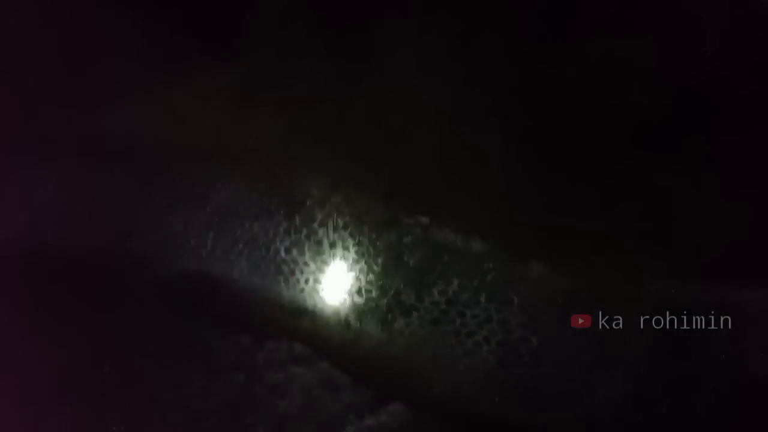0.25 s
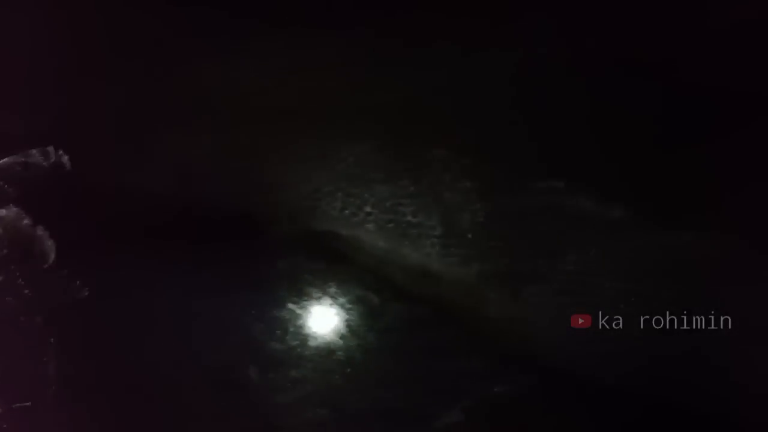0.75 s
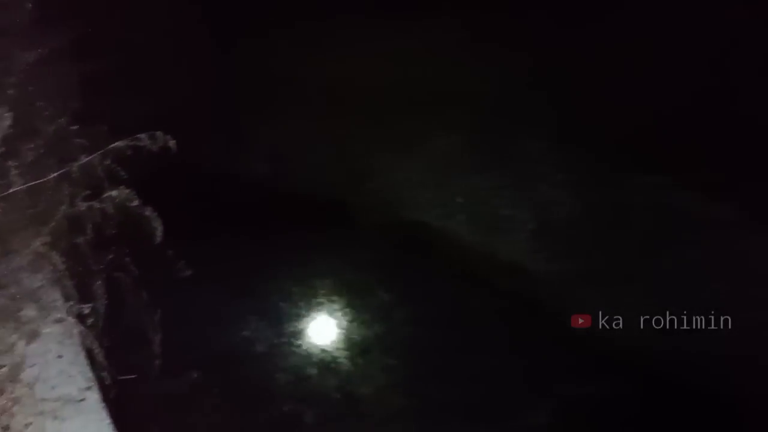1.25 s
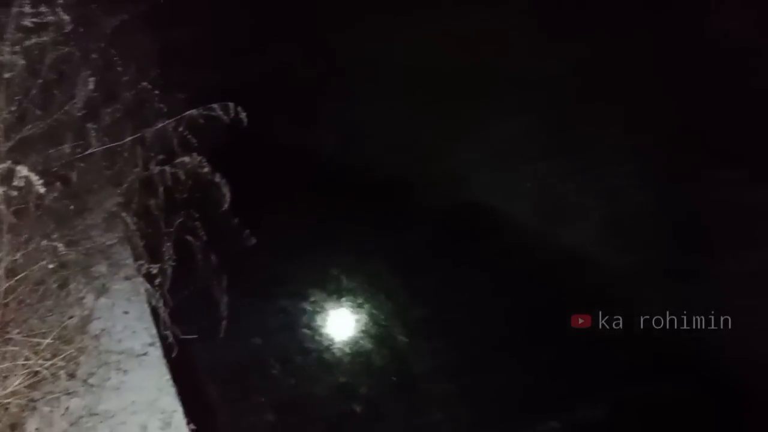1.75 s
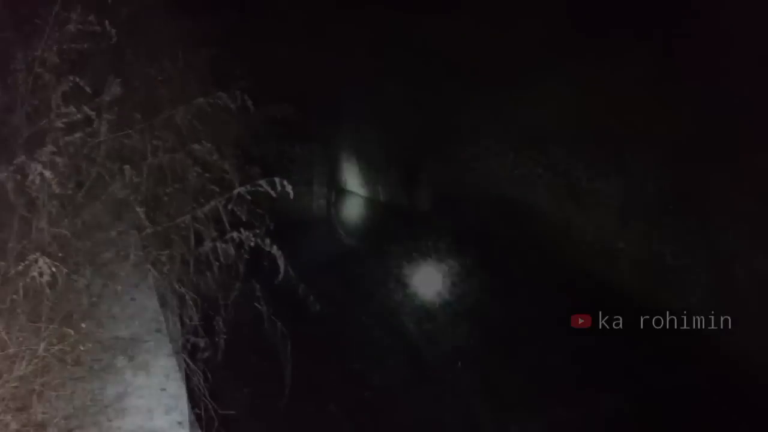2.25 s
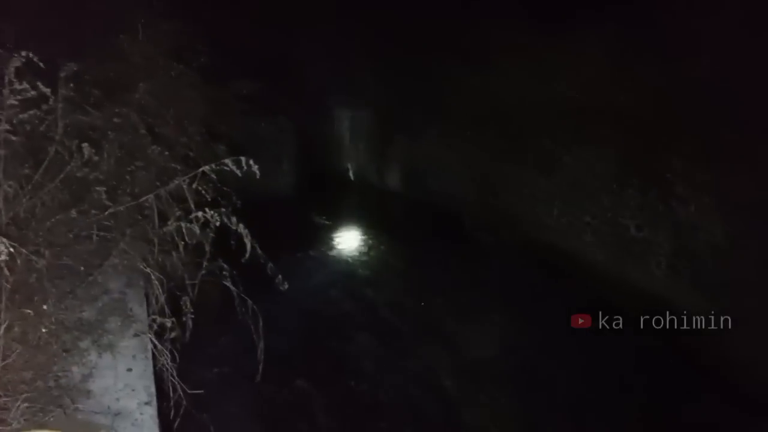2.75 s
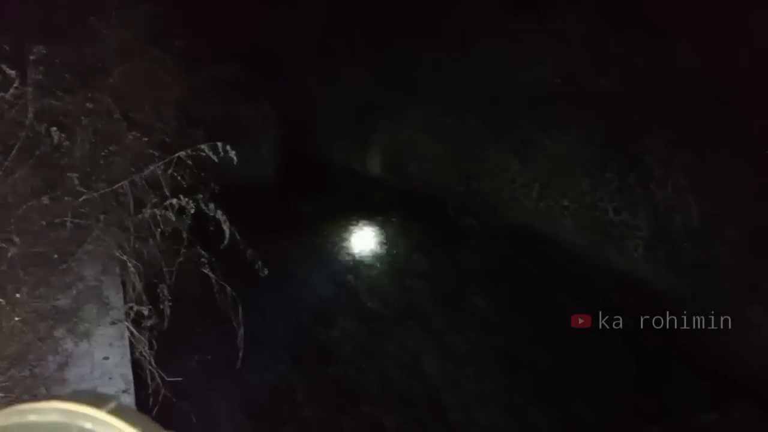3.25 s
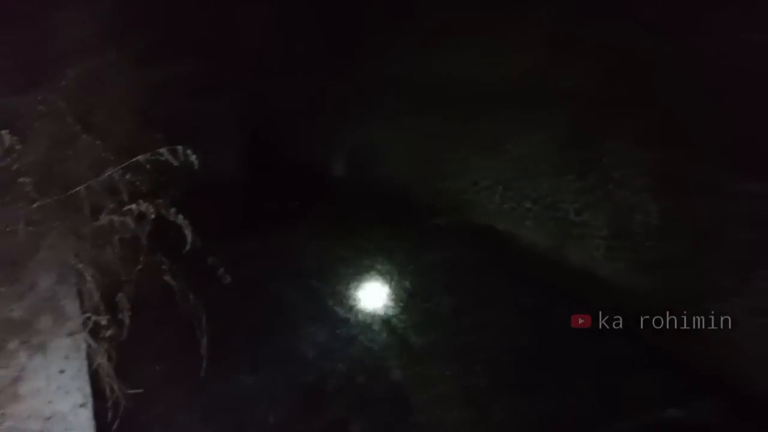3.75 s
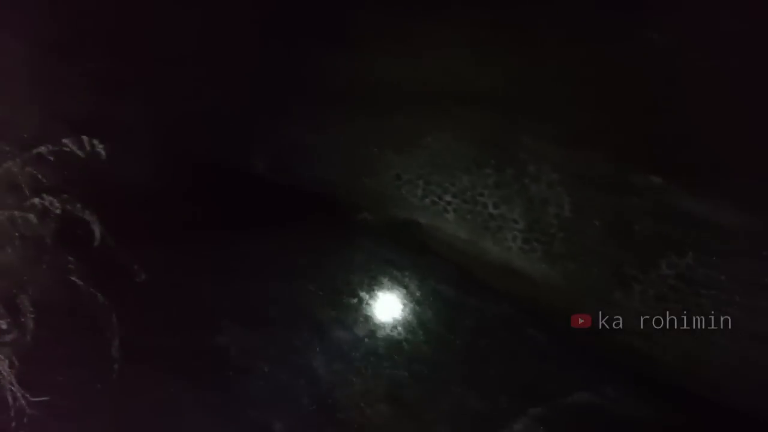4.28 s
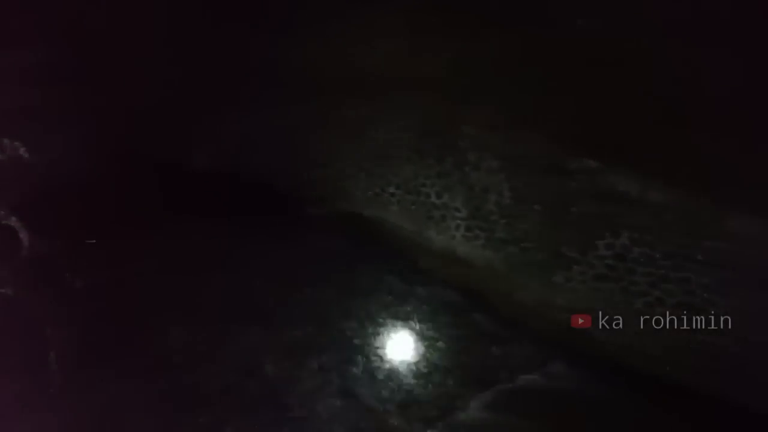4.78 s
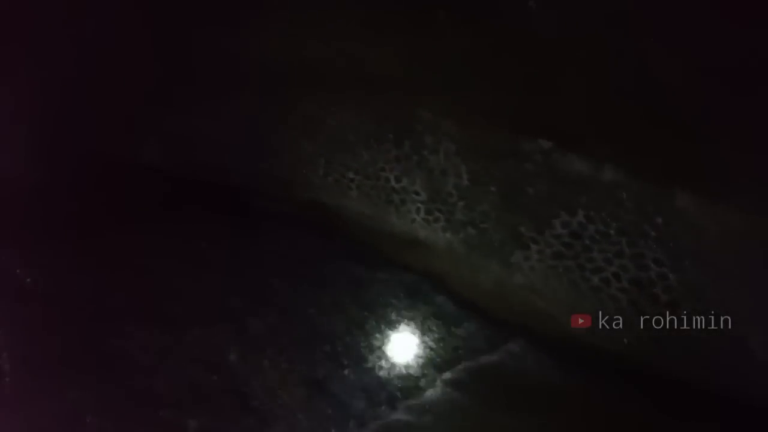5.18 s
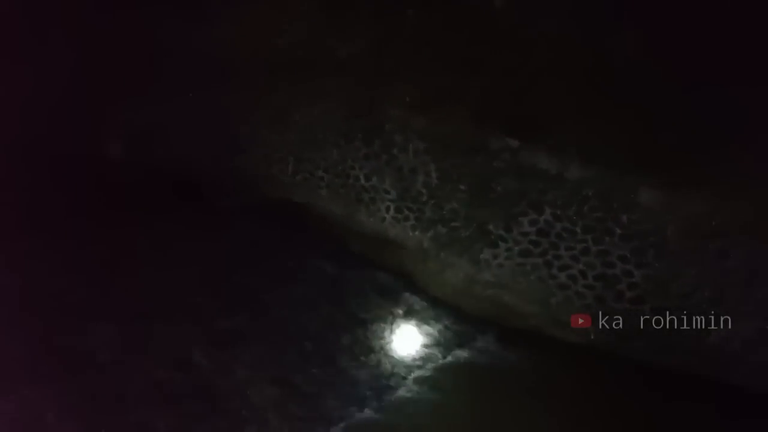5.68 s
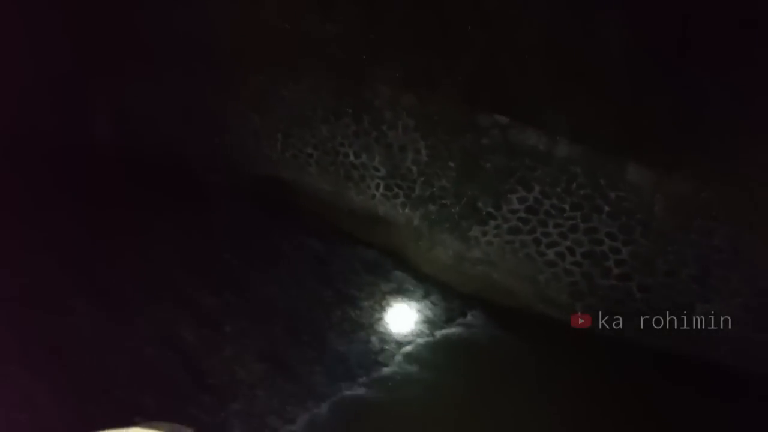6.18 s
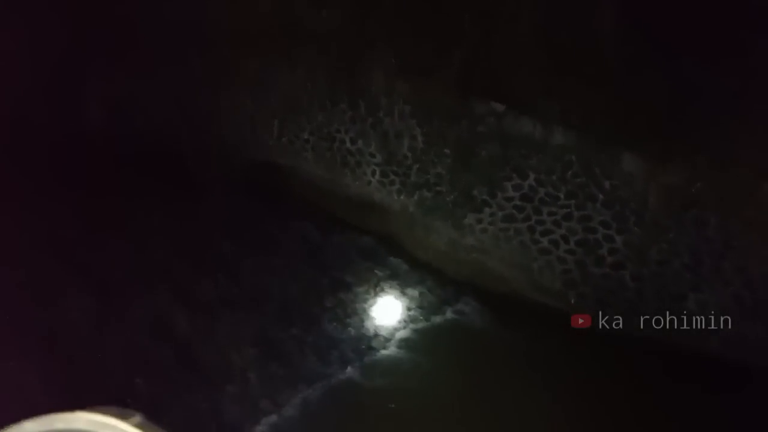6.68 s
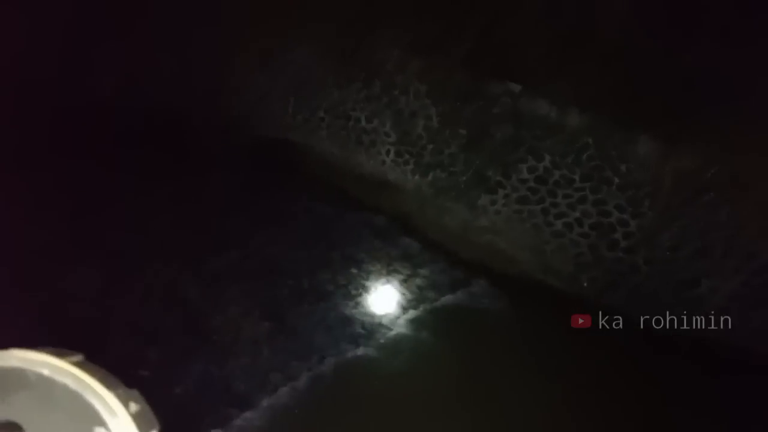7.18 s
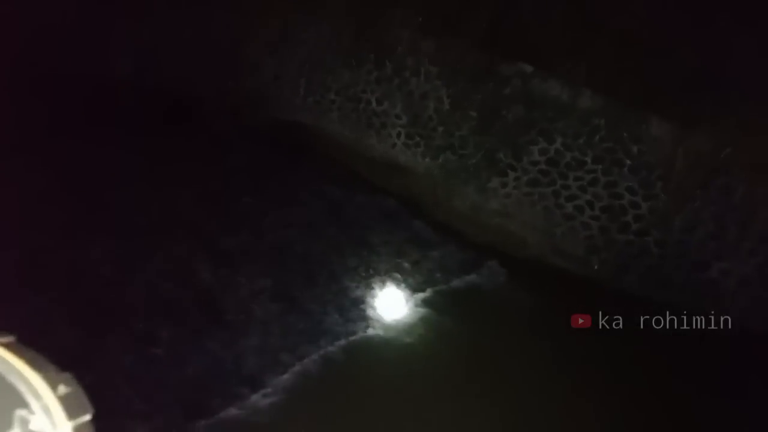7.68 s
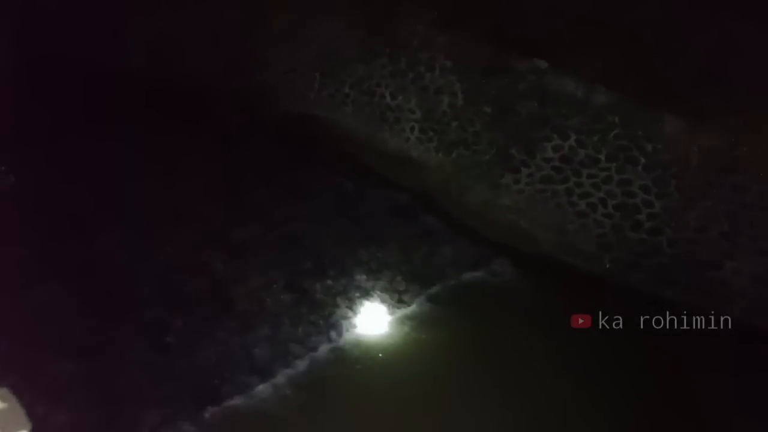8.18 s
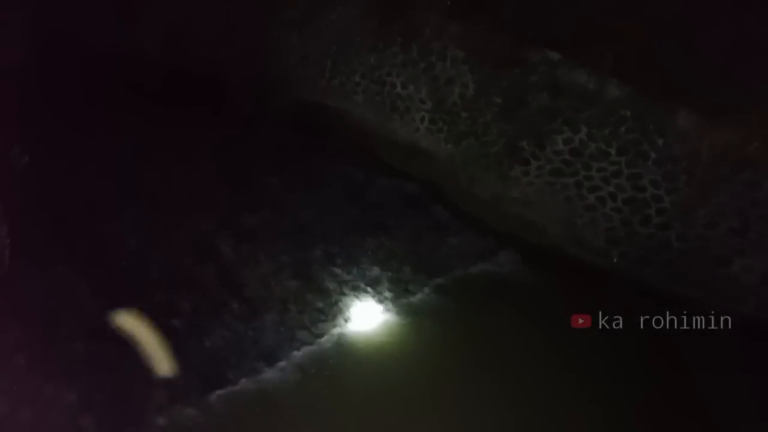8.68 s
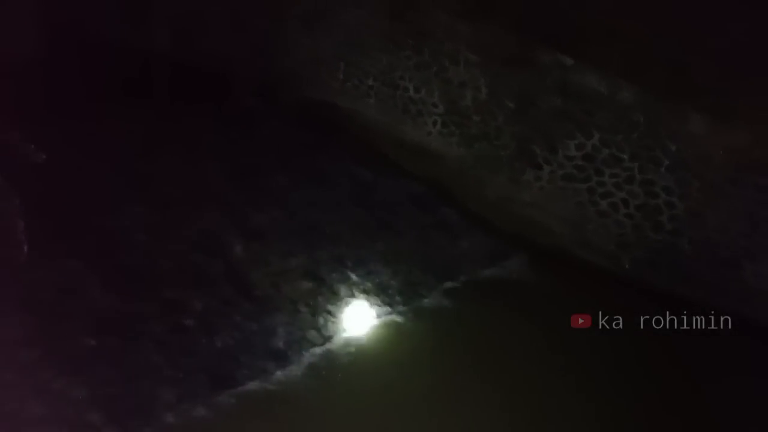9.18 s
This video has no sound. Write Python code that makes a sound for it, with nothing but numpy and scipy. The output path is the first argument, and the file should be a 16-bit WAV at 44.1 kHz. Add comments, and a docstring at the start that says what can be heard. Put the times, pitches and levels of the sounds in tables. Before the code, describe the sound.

A continuous torrent, close and mono, roars with merged bubbles beneath a thin steady hiss. Short gurgles follow each other several times a second, each sagging in pitch. The sound starts somewhat nasal with faint hums, ducks briefly near two seconds, then opens up fuller by three. Wind flutters and bumps on the hand-held microphone in uneven bursts, strongest between six and seven and a half seconds.

```python
"""In a stone-lined culvert, floodwater roars with merged bubbles, gulps in short, quick, sagging bursts and hisses.
The water is noise with random patches of gain; sine bubbles add splashes and fizz, and a carrier pitches the gulps.
The sound ducks for about a second and comes back fuller as the hand-held microphone turns to the channel.
Uneven gusts buffet the microphone: low noise bands, brief thumps and a low drone.
The sound is mono, with a deeply scalloped treble that flickers in narrow bands, over faint steady tones."""
import sys
import numpy as np
from scipy import signal
from scipy.fft import rfft, irfft, next_fast_len
from scipy.io import wavfile
from scipy.ndimage import uniform_filter1d, map_coordinates

SR = 44100
rng = np.random.default_rng(int(sys.argv[2]) if len(sys.argv) > 2 else 0)


def persist_wave(psi):
    """Save psi, clipped to +-1, as 16-bit WAV."""
    counts = np.round(np.clip(psi, -1, 1) * 32767).astype(np.int16)
    wavfile.write(sys.argv[1], SR, np.atleast_2d(counts).T)


N = 415863

# The current as heard from the bank, before each layer's trim: t/s, roar level/dB, spray level/dB
FLOW_LEVELS = [(0, -31, -38.5), (1.2, -29, -37.5), (1.9, -28.5, -36.5), (1.92, -31, -40), (2.1, -34, -42.5),
               (2.47, -35.5, -44), (3.01, -29.5, -38.5), (3.04, -27, -35), (3.6, -26.5, -35.5),
               (4.7, -27.5, -36), (9.43, -27.5, -35.5)]
# How far the microphone has turned to the channel: t/s, share [0-1]
MICROPHONE_TURN = [(0, 0), (1.8, 0), (3.05, 0.94), (9.43, 0.99)]
# Colour of the roar with the microphone turned aside: f/Hz, level/dB
ROAR_ASIDE_COLOUR = [(200, -70), (660, -30), (800, -4.5), (880, -2.5), (1050, 4.5), (1350, 4), (1550, -0.5),
                     (1750, -0.5), (2050, -11.5), (2300, -2.5), (2800, -10), (3200, -8), (3550, -25),
                     (4000, -55), (5000, -70)]
# Colour of the roar facing the channel: f/Hz, level/dB
ROAR_FACING_COLOUR = [(200, -70), (680, -46), (820, -11), (930, -1), (1080, 0), (1320, -3), (1550, -1.5),
                      (1800, -10.5), (2400, -10), (2650, -13.5), (2950, -13.5), (3400, -19), (4100, -36),
                      (5000, -70)]

# Larger waves folding over: start t/s, length t/s, level/dB, middle pitch f/Hz
GULP_EVENTS = [(0, .1, -38, 650), (0.177, 0.049, -34, 687), (0.319, 0.14, -34, 661),
               (0.533, 0.073, -34.5, 650), (0.657, 0.144, -36, 680.5), (0.887, .15, -36.5, 645),
               (1.109, 0.083, -35.5, 595), (1.271, 0.084, -36.5, 660), (1.57, 0.067, -38, 575),
               (1.71, 0.045, -36, 569), (1.839, .07, -35.5, 665), (2.0, .07, -38.5, 690),
               (2.153, 0.1494, -43, 590.6), (2.36, .08, -43, 637), (2.7, .14, -43, 592),
               (3.061, 0.072, -39, 558), (3.219, 0.056, -42, 554), (3.39, .09, -37.5, 719),
               (3.579, .05, -40, 606), (3.73, 0.066, -39, 630), (3.911, 0.051, -33.5, 574),
               (4.14, 0.16, -35, 665), (4.328, 0.11, -35.5, 650), (4.579, 0.13, -35.5, 619),
               (4.871, .08, -36.5, 621), (5.029, .12, -39.5, 660), (5.36, 0.059, -39.5, 596),
               (5.502, .12, -38.5, 648), (5.69, 0.066, -33.5, 668), (5.961, .12, -39.5, 630),
               (6.321, 0.056, -37, 715), (6.42, .12, -39.5, 614), (6.6, 0.052, -37.5, 560),
               (6.81, .08, -38, 675), (7.008, .07, -40, 570), (7.221, 0.057, -35.5, 679),
               (7.388, 0.088, -37.5, 660), (7.54, 0.15, -38.5, 655), (7.77, .1, -39, 560),
               (7.98, 0.056, -33.5, 607), (8.12, .05, -36.5, 665), (8.21, 0.057, -35, 555),
               (8.322, .13, -37.5, 587), (8.679, 0.067, -36, 550), (8.826, 0.071, -36, 660),
               (9.05, .05, -35, 693), (9.16, 0.058, -34.5, 720), (9.299, 0.066, -36, 663)]
# Colour filter of the gulps: f/Hz, level/dB
GULP_COLOUR = [(300, -45), (420, -13), (500, 4), (580, 3), (680, 0.5), (780, 1.5), (900, 22), (1300, -40)]
# Moments when the gurgle falls away: start t/s, length t/s
GURGLE_LULLS = [(1.66, 0.034), (2.503, 0.1002), (2.883, 0.0392), (3.5, 0.064), (3.65, 0.054), (3.99, .1),
                (4.47, 0.062), (5.779, 0.13), (7.152, 0.062), (7.49, 0.031), (8.5, .07), (8.778, .035),
                (8.992, .035)]
GULP_ATTACK_S, GULP_RELEASE_S = 0.0248, 0.02985
GULP_SAG_HZ = 68.4  # pitch fall from start to end of a gulp
# The small waves between gulps: level relative to the roar's base level, its swing, pitch and its wander
GURGLE_DB, GURGLE_SWING_DB, GURGLE_HZ, GURGLE_WANDER_HZ = -13, 2, 655.3, 27.97
LULL_DB, LULL_FADE_S, LULL_RISE_HZ = -6.5, .025, 30.02  # only the smaller, higher pockets are left

# Colour of the spray, with its treble scallops: f/Hz, level/dB
SPRAY_COLOUR = [(3900, -27), (4500, -19), (6000, -19.5), (6500, -5.5), (7250, -1.5), (8700, -5),
                (9300, -10.5), (9900, 0.5), (10700, 1.5), (11400, -5), (12900, -3.5), (13800, -13),
                (15000, -6.5), (15500, -11.5)]
# Narrow ring below the hiss, strong at first: t/s, level/dB
RING_LEVELS = [(0, -45), (1.8, -44), (1.92, -52), (2.9, -52), (3.1, -50.5), (9.43, -50)]
# Colour of the near splashes: f/Hz, level/dB
SPLASH_COLOUR = [(1300, -20), (1900, -3.5), (2500, -5), (3300, -6), (3700, -11.5), (4100, -41), (5000, -60)]
# Colour of the patchy bands at the treble edges: f/Hz, level/dB
FLICKER_COLOUR = [(2600, -21), (3300, -4.5), (3650, -6.5), (3950, -10), (4300, -20.5), (5300, -15),
                  (5700, -31.5), (6000, -9.5), (6300, -9), (6600, -6), (7200, -30)]
# Colour of the low murmur: f/Hz, level/dB
RUMBLE_COLOUR = [(20, -22), (60, -23), (150, -0.5), (240, 2.5), (320, 0.5), (450, 6), (900, -5),
                 (2000, -60)]

# Light air between the gusts, before its random swing: t/s, buffet level/dB
BREEZE_LEVELS = [(0, -61), (.9, -56), (1.8, -70), (2.7, -74), (3.4, -69), (4.6, -67), (5.3, -57),
                 (5.8, -67), (6.3, -56), (6.77, -68), (7.5, -61), (7.75, -65), (8.6, -58), (9, -66),
                 (9.43, -61)]
# Gusts striking the microphone: start t/s, length t/s, buffet level/dB
GUST_EVENTS = [(.4, 0.052, -53), (.49, .05, -47), (.62, .05, -42), (.72, 0.15, -47.5), (0.979, .04, -52),
               (1.095, .04, -51), (2.246, 0.13, -48.5), (2.88, .05, -57), (3.632, .07, -57.5),
               (3.882, .06, -56), (4.04, 0.049, -56), (4.44, .05, -58), (4.88, 0.066, -52),
               (5.02, 0.12, -50), (5.319, .19, -53), (5.61, .05, -56), (5.959, .07, -52.5),
               (6.169, 0.15, -48.5), (6.31, .1, -33), (6.522, .19, -47.5), (6.871, .08, -42.5),
               (6.97, .21, -44), (7.372, .06, -36), (7.46, .12, -47.5), (7.88, 0.68, -55)]
# Quick puffs that flutter higher up: start t/s, length t/s, flutter level/dB
PUFF_EVENTS = [(.385, .045, -47), (.455, .045, -47), (2.051, .05, -53), (2.421, 0.039, -57),
               (3.0, .04, -48), (3.629, .06, -44), (4.841, .04, -47), (4.997, .096, -45), (6.288, .13, -41),
               (7.02, 0.07, -44), (7.377, 0.062, -42), (7.47, .05, -43), (7.55, .04, -48),
               (8.066, 0.075, -45.5), (8.626, .04, -44), (9.278, .04, -51)]
# Colour of the buffeting: f/Hz, level/dB
BUFFET_COLOUR = [(15, -38), (35, -25), (55, -2.5), (72, 5.5), (105, 1.5), (135, -13), (220, -42)]
# Colour of the flutter: f/Hz, level/dB
FLUTTER_COLOUR = [(80, -28), (120, -5.5), (150, 7.5), (175, -1.5), (215, -12), (300, -44), (500, -60)]
# Hardest eddies: centre t/s, level/dB, pitch f/Hz, time from the centre to 1/e of the push t/s
EDDY_THUMPS = [(0.514, -38, 91.3, .012), (0.657, -43, 65, 0.012), (.85, -38, 84.6, .015),
               (2.324, -46, 74, 0.017), (6.318, -30, 134.2, 0.0069), (6.379, -24.5, 114, 0.017),
               (7.048, -37, 135, .014), (7.397, -30.5, 94.6, 0.0095)]
# Low drone swelling in the longer gusts: start t/s, end t/s, level/dB between its fades
DRONE_SWELLS = [(4.903, 5.545, -59), (6.859, 7.225, -47), (7.836, 8.588, -53.5)]
BREEZE_SWING_DB = 2
GUST_ATTACK_S, GUST_RELEASE_S = 0.026, .045
PUFF_ATTACK_S, PUFF_RELEASE_S = .02, .025
FLUTTER_DB, FLUTTER_SWING_DB = -31.5, 3.5  # between puffs, relative to the roar's base level

# Faint steady tones behind the water: f/Hz, level/dB before the fade, end t/s
HUM_TONES = [(303, -68, 1.87), (370, -71, 1.3), (421, -68.5, 1.85), (4510, -76, 9.43)]
TOP_HZ = 15520  # the recorder's band limit


def roar(level_db):
    """Broken water: countless merged bubbles as patchy noise, coloured by where the microphone points."""
    water = churn(patchy_db=2.6, size=2)
    turn = np.clip(curves(MICROPHONE_TURN)[0], 0, 1)
    aside = (1 - turn) * coloured(water, ROAR_ASIDE_COLOUR)
    facing = turn * coloured(water, ROAR_FACING_COLOUR)
    level = amp(level_db - 1.2 + 0.34 * wobble(30))
    return level * steadied(unit(aside + facing), span=0.089)


def gulps(roar_db):
    """Folding waves drag air under; each cloud of pockets rings around a pitch that sags as it sinks."""
    level_db = roar_db + GURGLE_DB + GURGLE_SWING_DB * wobble(14)
    pitch_hz = GURGLE_HZ + GURGLE_WANDER_HZ * wobble(12)
    for start, length in GURGLE_LULLS:
        at, lull = swell(start, length, LULL_FADE_S, LULL_FADE_S)
        level_db[at] += LULL_DB * lull
        pitch_hz[at] += LULL_RISE_HZ * lull
    for start, length, db, hz in GULP_EVENTS:
        at, fold = swell(start, length, GULP_ATTACK_S, GULP_RELEASE_S)
        progress = np.clip((at / SR - start) / length, 0, 1)
        sagging_hz = hz - GULP_SAG_HZ * (progress - .5)
        level_db[at] += fold * (db - level_db[at])
        pitch_hz[at] += fold * (sagging_hz - pitch_hz[at])

    def pocket_noise():
        """Low patchy noise that spreads the gulp around its pitch."""
        width_hz = 85
        return filtered(churn(patchy_db=4, size=1), lambda hz: np.exp(-(hz / width_hz) ** 2 / 2))

    cloud = pocket_noise()
    swirl = pocket_noise()
    phase = 2 * np.pi * np.cumsum(pitch_hz) / SR
    water = coloured(cloud * np.cos(phase) + swirl * np.sin(phase), GULP_COLOUR)
    return amp(level_db) * steadied(water, span=0.097)


def spray(level_db):
    """Bursting foam hisses as noise and tiny bubbles, with a narrow ring below the hiss."""
    fizz = bubbles(count=14000, low_hz=4860, high_hz=15000, cycles=2.1, spread_db=4, rise=.05, size=64)
    hiss = coloured(churn(patchy_db=1.2) + amp(-12) * fizz, SPRAY_COLOUR)
    ring_hz, width_hz = 5210, 235
    ring = filtered(churn(patchy_db=1.45), lambda hz: np.exp(-((hz - ring_hz) / width_hz) ** 2 / 2))
    hiss_level = amp(level_db + 0.66 + 0.25 * wobble(40))
    return hiss_level * hiss + amp(curves(RING_LEVELS)[0]) * unit(ring)


def splashes(level_db):
    """Nearer wavelets shed small ringing bubbles among patchy noise."""
    drops = bubbles(count=1500, low_hz=1700, high_hz=3800, cycles=170, spread_db=2.5, rise=.02, size=3000)
    clusters = churn(patchy_db=8, size=3)
    near = steadied(coloured(clusters + amp(-5.5) * drops, SPLASH_COLOUR), span=0.14)
    return amp(level_db - 12.0) * near


def treble_flicker(level_db):
    """Narrow treble bands flicker: strongly patchy noise that follows the roar's level."""
    return amp(level_db - 22.0) * coloured(churn(patchy_db=8, size=7), FLICKER_COLOUR)


def wind(roar_db):
    """Gusts and puffs rise out of a breeze on the microphone; single eddies thump it and long gusts drone."""
    t = np.arange(N) / SR
    breeze_db = curves(BREEZE_LEVELS)[0] + BREEZE_SWING_DB * wobble(13)
    calm_flutter_db = roar_db + FLUTTER_DB + FLUTTER_SWING_DB * wobble(15)
    buffet = gusty(breeze_db, GUST_EVENTS, GUST_ATTACK_S, GUST_RELEASE_S)
    flutter = gusty(calm_flutter_db, PUFF_EVENTS, PUFF_ATTACK_S, PUFF_RELEASE_S)
    air = buffet * steadied(coloured(rng.standard_normal(N), BUFFET_COLOUR), span=0.044)
    air += flutter * steadied(coloured(rng.standard_normal(N), FLUTTER_COLOUR), span=0.11)
    for s, db, hz, length in EDDY_THUMPS:
        push = np.exp(-((t - s) / length) ** 2)  # a big eddy sweeps the smaller ones aside
        thump = np.sin(2 * np.pi * (hz * (t - s) + rng.random()))
        air = (1 - push) * air + amp(db) * push * thump
    drone_hz = 54.5 * (1 + 0.026 * wobble(11))
    drone = unit(np.sin(2 * np.pi * np.cumsum(drone_hz) / SR))
    for start, end, db in DRONE_SWELLS:
        fade = np.clip(np.minimum(t - start, end - t) / .08, 0, 1)
        air += amp(db) * fade * drone
    return air


def rumble(level_db):
    """The mass of moving water murmurs far below the roar as patchy low noise."""
    return amp(level_db - 28) * coloured(churn(patchy_db=4.5), RUMBLE_COLOUR)


def hums():
    """Low hums at the start and a thin whine throughout: sines made slightly unsteady in phase."""
    t = np.arange(N) / SR
    tones = np.zeros(N)
    for hz, db, end in HUM_TONES:
        fade = np.clip((end - t) / .1, 0, 1)
        tones += amp(db) * fade * unit(np.sin(2 * np.pi * hz * t + 0.55 * wobble(7.7)))
    return tones


def bubbles(count, low_hz, high_hz, cycles, spread_db, rise, size):
    """Bubbles born at random: each rings in decay and rises in pitch as it nears the surface."""
    when, pitch, strength, life = rng.random((count, 4)).T[:, :, None]
    turns = low_hz * (high_hz / low_hz) ** pitch * np.arange(size) / SR
    age = turns / (cycles * (.5 + life))
    tone = np.sin(2 * np.pi * turns * (1 + rise * age / 2))
    ring = tone * np.exp(-2 * age) * (1 - np.exp(-2 * turns))
    loudness = amp(-spread_db * np.log(np.maximum(strength, np.exp(-4))))
    grains = loudness * ring * np.linspace(1, 0, size)  # each fades out by its last sample
    at = (when * N).astype(int) + np.arange(size)
    return unit(np.bincount(at.ravel(), grains.ravel(), N)[:N])


def churn(patchy_db, size=3):
    """White noise in patches of random gain, size bands of 43 Hz wide and some 70 ms long."""
    z = signal.stft(rng.standard_normal(N), nperseg=1024)[2]
    field = uniform_filter1d(rng.standard_normal(z.shape), size=size, axis=0)
    field = uniform_filter1d(field, size=6, axis=1)
    patches = 2 * np.tanh(unit(field) / 2)  # no patch stands far above the rest
    return unit(signal.istft(z * amp(patchy_db * patches), nperseg=1024)[1][:N])


def gusty(calm_db, gusts, attack, release):
    """The gain of moving air: each (start, length, dB) gust rises out of the calm level."""
    gain = amp(calm_db)
    for start, length, db in gusts:
        at, envelope = swell(start, length, attack, release)
        gain[at] = np.maximum(gain[at], amp(db) * envelope)
    return gain


def swell(start, length, attack, release):
    """The samples an event covers and its rounded envelope, at half height at its start and end."""
    margin_s = .12
    first = max(int((start - margin_s) * SR), 0)
    last = min(int((start + length + margin_s) * SR), N)
    at = np.arange(first, last)
    t = at / SR - start
    return at, .5 + .5 * np.tanh(2 * np.minimum(t / attack, (length - t) / release))


def steadied(x, span):
    """Even out the swells of x that last longer than span seconds."""
    power = uniform_filter1d(x ** 2, size=max(int(span * SR), 1))
    return unit(x / np.sqrt(np.abs(power) + 0.029))  # the floor limits the lift of quiet moments


def coloured(x, spectrum):
    """Filter x through (Hz, dB) points on a log frequency axis, at rms 1."""
    f, db = np.transpose(spectrum)
    return unit(filtered(x, lambda hz: amp(np.interp(np.log(hz + 1), np.log(f), db))))


def filtered(x, response):
    """Multiply the spectrum of x by a response of frequency."""
    size = next_fast_len(N + SR // 2)
    return irfft(rfft(x, size) * response(np.fft.rfftfreq(size, 1 / SR)), size)[:N]


def wobble(rate):
    """A smooth random curve with rate knots a second."""
    knots = rng.standard_normal(int(N * rate / SR) + 4)
    return map_coordinates(knots, [np.arange(N) * rate / SR])


def curves(rows):
    """One value per sample for each column after the time."""
    s, *cols = np.transpose(rows)
    return [np.interp(np.arange(N) / SR, s, c) for c in cols]


def unit(x):
    """Scale to rms 1."""
    return x / np.sqrt(np.mean(x ** 2) + 1e-20)


def amp(db):
    """Decibels to gain."""
    return 10 ** (np.asarray(db) / 20)


def scene():
    """Water, wind and faint tones, alike in both channels."""
    roar_db, spray_db = curves(FLOW_LEVELS)
    water = roar(roar_db) + gulps(roar_db) + spray(spray_db) + splashes(roar_db) + rumble(roar_db)
    mono = water + treble_flicker(roar_db) + wind(roar_db) + hums()
    return np.array([mono, mono])


def record(dry):
    """The recorder keeps nothing above its band limit."""
    return np.array([filtered(channel, lambda hz: hz < TOP_HZ) for channel in dry])


dry = scene()
out = record(dry)
persist_wave(out)
```